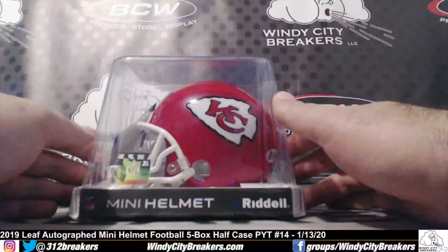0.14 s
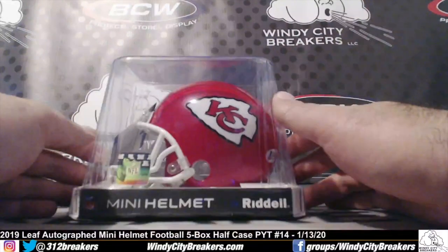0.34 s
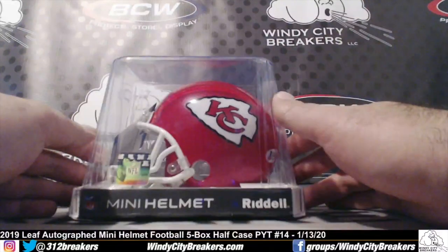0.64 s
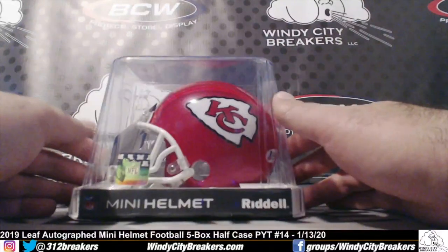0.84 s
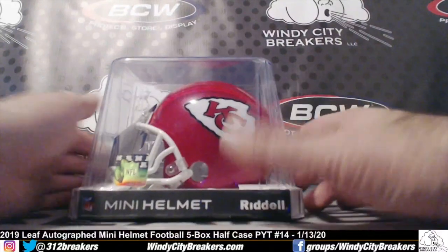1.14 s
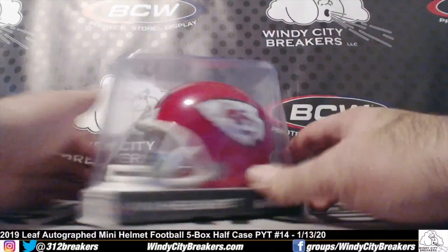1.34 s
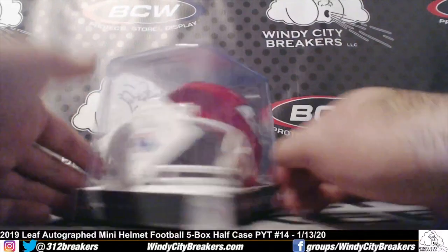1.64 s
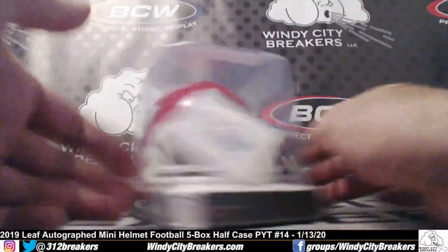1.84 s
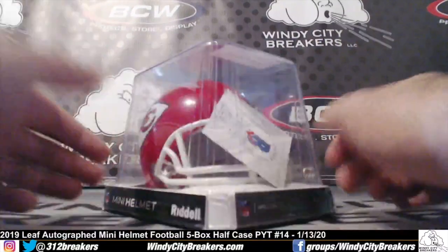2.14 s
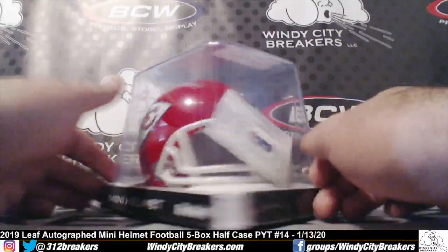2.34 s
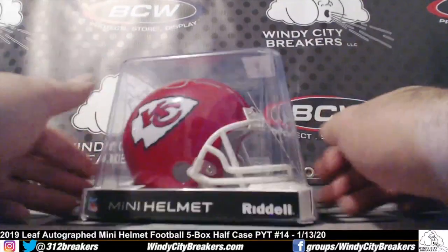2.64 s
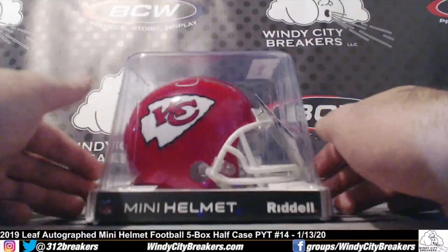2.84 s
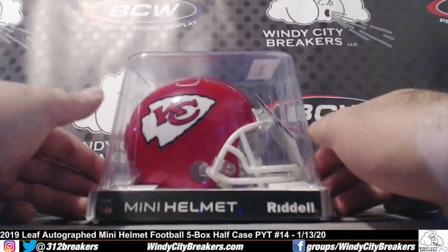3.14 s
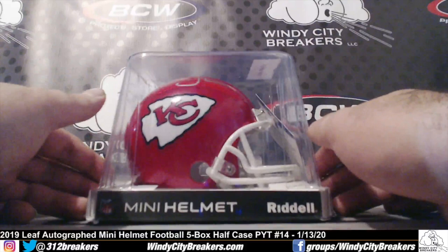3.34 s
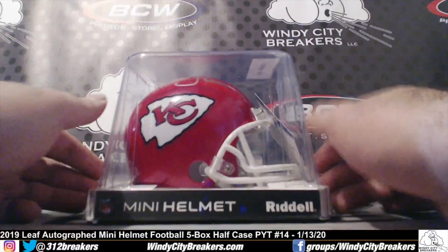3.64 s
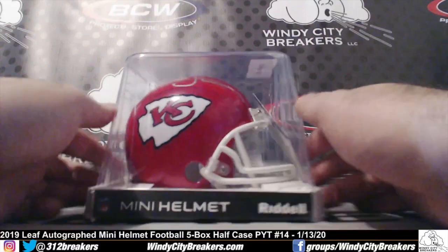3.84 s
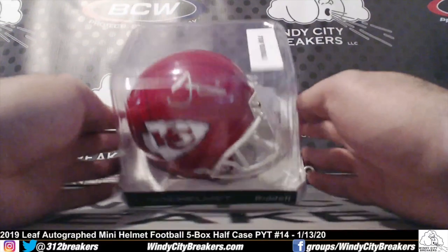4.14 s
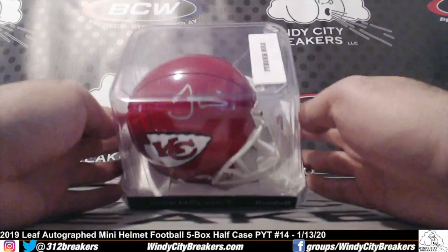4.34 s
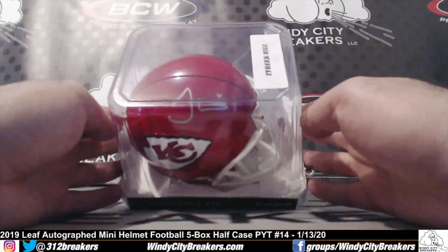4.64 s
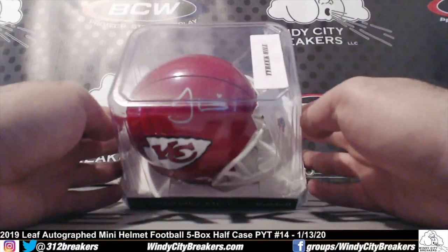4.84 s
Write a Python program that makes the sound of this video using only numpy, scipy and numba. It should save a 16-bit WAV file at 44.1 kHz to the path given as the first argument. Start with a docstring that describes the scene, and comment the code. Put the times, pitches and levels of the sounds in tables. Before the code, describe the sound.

Close plastic handling: short rasping slides, dull bumps and crisp rattling ticks come in bursts, separated by near silence and faint room tone.

```python
"""A small room, a desk microphone close to a table mat; two hands turn a clear plastic display cube.
First room tone, a faint scuff and a soft low hum as pushes reach the table, most likely the stand swaying.
From 0.6 s the base rasps in stick-slip on the mat, the struck cube rings in decaying modes, fingers scuff
its walls and the loose lid ticks in bursts of hard-edged noise; fine skin hiss joins at 1.6 s.
Quick twists and knocks fill 2 to 2.8 s; slides return at 3.4 s, then lid ticks and a last hum thin out."""
import sys
import numpy as np
from scipy import signal
from scipy.fft import rfft, irfft
from scipy.io import wavfile
from numba import njit

SR = 44100
rng = np.random.default_rng(int(sys.argv[2]) if len(sys.argv) > 2 else 0)


def file_out(sig):
    """Save sig as 16-bit WAV at sys.argv[1]."""
    # one column per channel
    cols = np.atleast_2d(sig).T
    # limit, then scale
    lim = np.clip(cols, -1, 1)
    pcm = np.round(lim * 32767).astype(np.int16)
    wavfile.write(sys.argv[1], SR, pcm)


N = 220808
T = np.arange(N) / SR


def undb(db):
    """Decibels to gain."""
    return 10 ** (np.asarray(db) / 20)


def unit(x):
    """Scale to rms 1."""
    return x / np.sqrt(np.mean(x ** 2))


def strike_unit(x):
    """Scale a hit so that its first 10 ms have rms 1."""
    return x / np.sqrt(np.mean(x[:SR // 100] ** 2))


def add(out, s, x, pan_db=0):
    """Mix a sound into both channels at time s; a positive pan leans left."""
    i = int(s * SR)
    x = x[:N - i]
    out[:, i:i + len(x)] += undb([[pan_db / 2], [-pan_db / 2]]) * x


def colour(x, points, peaks=(), size=4096):
    """Causal minimum-phase filter from a (Hz, dB) outline with resonances (Hz, width Hz, dB) on top."""
    hz = np.maximum(np.fft.rfftfreq(size, 1 / SR), 1)
    f, db = np.transpose(points)
    db = np.interp(np.log(hz), np.log(f), db)
    for centre, width, peak_db in peaks:
        db = db + peak_db / (1 + (2 * (hz - centre) / width) ** 2)
    # folding the cepstrum forward in time makes the filter causal
    cepstrum = irfft(np.log(undb(db)))[:size // 2]
    cepstrum[1:] *= 2
    impulse = irfft(np.exp(rfft(cepstrum, size)))
    return signal.fftconvolve(x, impulse)[:len(x)]


@njit
def bandpass(x, hz, share):
    """State-variable band-pass with a moving centre; share = width / centre."""
    y, band, low = np.empty(len(x)), 0., 0.
    for i in range(len(x)):
        g = np.tan(np.pi * hz[i] / SR)
        v = (band + g * (x[i] - low)) / (1 + g * (g + share))
        band, low, y[i] = 2 * v - band, low + 2 * g * v, share * v
    return y


def fade(t, t60):
    """Exponential decay, 60 dB down after t60."""
    return np.exp(-np.log(1000) * t / t60)


def walk(rate):
    """Smooth random wander with a spread near 1, rate turning points per second."""
    knots = rng.standard_normal(N // 100)
    return np.interp(T * rate, np.arange(len(knots)), knots)


def slips(n, rate, spread_db):
    """Tiny stick-slip releases of uneven size, rate per second."""
    released = rng.random(n) < rate / SR
    return released * rng.standard_normal(n) * undb(spread_db * rng.exponential(size=n))


# spectrum of the empty room at the microphone: (f/Hz, relative level/dB)
ROOM_SPECTRUM = [(30, -36), (140, -2.5), (290, -12), (850, -20.5), (1350, -29.5), (2090, -29.5),
                 (3200, -34.5), (4300, -28.5), (6300, -37.5), (8150, -51)]
ROOM_TONE_DB = -70.5  # middle rms level before the wander and the microphone


def room_tone(side_db=-8, wander_db=2.0):
    """Quiet, slightly uneven rumble and hiss of the room."""
    mid, side = (unit(colour(rng.standard_normal(N), ROOM_SPECTRUM)) for _ in range(2))
    stereo = mid + undb(side_db) * side * np.array([[1], [-1]])
    return stereo * undb(ROOM_TONE_DB + wander_db * walk(35))


def room(x, wet_db=-24, t60=0.11, side_db=2):
    """Short, soft reflections from the desk and the walls: decaying noise tails, one mid and one side."""
    t = T[:SR // 2]
    envelope = fade(t, t60) * np.minimum(t / 0.0047, 1)
    tails = [colour(rng.standard_normal(len(t)) * envelope, [(1500, -5.5), (7000, -4.5)]) for _ in range(2)]
    mid, side = (signal.fftconvolve(x.mean(axis=0), h / np.sqrt(np.sum(h ** 2)))[:N] for h in tails)
    return x + undb(wet_db) * (mid + undb(side_db) * side * np.array([[1], [-1]]))


# swells of the low hum: (t/s, length/s, relative level/dB)
HUM_SWELLS = [(0.414, 0.1, -50.5), (0.534, 0.096, -43.5), (0.972, 0.037, -41.5), (1.15, 0.07, -45),
              (1.565, 0.07, -41), (1.939, 0.2, -45.5), (2.09, 0.12, -48), (2.283, 0.081, -43.5),
              (2.498, 0.1, -41), (2.911, 0.075, -45.5), (4.506, 0.13, -46)]


def sways(gain_db=0, hz=138, glide=1.0, lowest_at=0.49, waver=.03, flutter_db=3, pan_db=14):
    """A low tone swells and dies, gliding down as weight comes on and up as it leaves; stronger on the left."""
    out = np.zeros((2, N))
    for s, length, db in HUM_SWELLS:
        n = int(length * SR)
        progress = np.linspace(0, 1, n)
        pitch = hz * (1 + glide * (progress - lowest_at) ** 2 + waver * walk(52)[:n])
        swell = np.sin(np.pi * progress) * undb(flutter_db * walk(36)[:n])
        tone = np.sin(2 * np.pi * np.cumsum(pitch) / SR) * swell
        # the divisor keeps the mean gain of the two channels independent of the pan
        add(out, s, 2 * undb(db + gain_db) * tone / np.cosh(np.log(undb(pan_db / 2))), pan_db)
    return out


# spectrum of skin on the smooth wall: (f/Hz, relative level/dB)
SKIN_HISS = [(1760, -65), (3000, -16), (3760, -12.5), (6530, 1), (7310, -8), (8150, -22.5)]
# strokes of skin gliding over the smooth wall: (t/s, length/s, relative level/dB)
SKIN_GLIDES = [(1.606, 0.18, -56), (2.211, 0.15, -56), (2.512, 0.16, -63)]


def glides(gain_db=3, judder_db=-7.0):
    """A light, fast touch only stirs the treble; it swells and fades with the stroke."""
    out = np.zeros((2, N))
    for s, length, db in SKIN_GLIDES:
        n = int(length * SR)
        hiss = unit(colour(slips(SR // 4, 10000, 0.86), SKIN_HISS))[:n]
        hiss = hiss * undb(judder_db * walk(57)[:n])
        stroke = np.sin(np.linspace(0, np.pi, n))
        add(out, s, undb(db + gain_db) * hiss * stroke)
    return out


# resonances of the cube and its base: (f/Hz, relative level/dB, t60/s); scuffs use f and level, knocks all
CUBE_MODES = [(246, -8, 0.012), (286.3, 4, 0.04), (351.5, -4, 0.14), (492, -7.5, 0.071), (560, 0, 0.049),
              (649.4, 0.5, 0.071), (808, -4.5, 0.027), (1082, -2.5, 0.031), (1360, -1, 0.016),
              (1900, 2.5, 0.023)]
# scuffs of skin and base: (t/s, length/s, relative level/dB, middle pitch f/Hz, what the contact does)
CONTACT_SCUFFS = [(0.371, 0.043, -56, 234, "settle"), (0.739, 0.077, -37, 467, "press"),
                  (0.956, 0.085, -41, 407, "press"), (1.088, 0.13, -36, 493, "lift"),
                  (1.209, 0.04, -38.5, 284, "drag"), (1.323, 0.03, -46, 950, "settle"),
                  (1.428, 0.047, -38, 704, "press"), (1.539, 0.081, -33.5, 345, "lift"),
                  (1.622, 0.073, -37, 884, "drag"), (1.751, 0.025, -59, 840, "drag"),
                  (1.774, 0.061, -44.5, 148, "settle"), (2.105, 0.13, -41.5, 666, "drag"),
                  (2.283, 0.05, -46, 537, "press"), (2.453, 0.038, -59, 400, "drag"),
                  (2.525, 0.014, -43, 1740, "press"), (2.556, 0.095, -43, 390, "drag"),
                  (2.781, 0.036, -36.5, 893, "press"), (2.8, 0.047, -39.5, 536, "lift"),
                  (2.847, 0.044, -51, 690, "drag"), (3.425, 0.12, -45, 321, "settle"),
                  (3.578, 0.027, -37, 148, "settle"), (3.609, 0.069, -40, 390, "press"),
                  (3.725, 0.03, -40, 680, "press"), (3.825, 0.07, -45.5, 150, "settle"),
                  (3.849, 0.091, -49.5, 656, "settle"), (3.996, 0.048, -46.5, 170, "settle"),
                  (4.346, 0.063, -60.5, 500, "press")]
# a scuff holding a steady pitch is a drag, under either label
CONTACT_SCUFFS = [(*row, "drag" if contact == "settle" else contact) for *row, contact in CONTACT_SCUFFS]
# how far the pitch moves during a scuff, contact -> octaves: a press sinks, a lift climbs, a drag stays
SCUFF_PITCH_OCTAVES = {"press": -1.9, "settle": 0.019, "drag": 0, "lift": 0.86}
SCUFF_WIDTH = .45  # width of the resonance as a share of its pitch


def scuffs(gain_db=0, judder_db=1.5, rise_s=0.0037, fall_db=15, body_db=8, rumble_db=-19, rumble_hz=95,
           pan_db=1.5):
    """Skin and base judder in short runs; pitch sinks as contact spreads, climbs as it lifts, holds in a drag."""
    out, t = np.zeros((2, N)), T[:SR // 4]
    body = [(hz, hz / 9, body_db + db) for hz, db, _ in CUBE_MODES if hz < 1500]
    outline = [(60, 3.0), (190, 7.0), (260, -5.0), (1800, -11.5), (5000, -21.5)]
    rumble_outline = [(rumble_hz / 2, -14), (rumble_hz, 0), (600, -35), (3000, -70)]
    for s, length, db, middle_hz, contact in CONTACT_SCUFFS:
        progress = t / length
        hz = middle_hz * 2 ** (SCUFF_PITCH_OCTAVES[contact] * (np.minimum(progress, 1) - .5))
        run = colour(slips(len(t), 2700, 0.86), outline, body)
        run = bandpass(run, hz, SCUFF_WIDTH) * undb(judder_db * walk(170)[:len(t)])
        run *= np.minimum(t / rise_s, 1) * undb(-fall_db * progress ** 2)
        run /= np.sqrt(np.sum(run ** 2) / (length * SR / 2))
        # the table rumbles late, once the weight bears on it
        rumble = unit(colour(rng.standard_normal(len(t)), rumble_outline))
        rumble *= np.exp(-((progress - .7) / 0.56) ** 2)
        add(out, s, undb(db + gain_db) * (run + undb(rumble_db) * rumble), pan_db)
    return out


# thin wall resonances, for ticks and slides alike: (f/Hz, width/Hz, peak level/dB)
WALL_MODES = [(693.7, 160, 4), (1217, 350, 3.5), (2130, 130, 4), (3750, 130, 3), (5200, 1200, 3.25)]
# spectrum of the hard plastic lid: (f/Hz, relative level/dB)
LID_SPECTRUM = [(240, -56), (400, -27.5), (1500, -4.5), (2720, -4), (3010, 2), (4020, -1), (4390, 1.5),
                (4860, 1), (7280, -14), (8150, -34.5)]
# the lid ticking in its seat: (t/s, relative level/dB)
LID_TICKS = [(0.684, -46), (1.0664, -33.5), (1.439, -21.5), (1.5151, -20), (1.528, -17.5), (1.554, -29),
             (1.572, -22), (1.579, -27), (1.586, -29.5), (1.598, -33.5), (2.122, -44), (2.1403, -33),
             (3.423, -43.5), (3.7165, -30), (3.729, -26), (3.8, -37.5), (3.853, -33.5), (3.897, -34.5),
             (4.106, -39), (4.184, -27), (4.198, -38), (4.296, -32.5), (4.340, -33.5), (4.442, -36.5),
             (4.8691, -35.5)]
SNAP_T60, LID_T60, HOLLOW_T60 = .011, .07, .13  # s


def clicks(gain_db=-13, ring_db=-6, spike=4, pan_db=-2, hollow_hz=1500, hollow_db=-13):
    """A sharp snap of hard plastic, a short, duller lid ring, and a hollow box note that outlasts both."""
    out, t = np.zeros((2, N)), T[:SR // 6]
    for s, db in LID_TICKS:
        snap, ring, hollow = rng.standard_normal((3, len(t)))
        snap[0] = spike
        snap = colour(snap * fade(t, SNAP_T60), LID_SPECTRUM, WALL_MODES)
        ring = colour(ring * fade(t, LID_T60), LID_SPECTRUM, WALL_MODES)
        ring = colour(ring, [(1400, 10.0), (3200, -0.5)])
        for _ in range(2):
            hollow = bandpass(hollow, np.full(len(t), float(hollow_hz)), 0.13)
        hollow = undb(hollow_db) * unit(hollow) * fade(t, HOLLOW_T60)
        tick = strike_unit(snap) + undb(ring_db) * strike_unit(ring) + hollow
        add(out, s, undb(db + gain_db) * tick, pan_db)
    return out


BOUNCE_SCATTER = .25  # share of the rebound delay


def with_bounce(events, delay_s, drop_db):
    """Follow every hit with a weaker second one, a little sooner or later each time."""
    delays = delay_s * (1 + BOUNCE_SCATTER * rng.uniform(-1.1, 1, len(events)))
    hits = []
    for (s, db, *rest), lag in zip(events, delays):
        hits += [(s, db, *rest), (s + lag, db + drop_db, *rest)]
    return hits


# the cube knocking on table and fingers:
# (t/s, relative level/dB, strongest pitch f/Hz, bare or cushioned contact)
CUBE_KNOCKS = [(.627, -50, 656, "bare"), (.682, -38.5, 1530, "bare"), (.722, -31, 560, "cushioned"),
               (.738, -24, 595, "cushioned"), (.752, -32.5, 436, "cushioned"),
               (.777, -26, 325, "cushioned"), (.963, -25.5, 323, "cushioned"), (1.066, -19, 362, "bare"),
               (1.070, -25, 1280, "bare"), (1.080, -21, 366, "bare"), (1.090, -26.5, 1050, "bare"),
               (1.127, -31.5, 1260, "bare"), (1.5153, -12.5, 322, "bare"), (1.522, -11, 261, "cushioned"),
               (1.526, -10.5, 556, "bare"), (2.0495, -26, 666, "cushioned"),
               (2.0744, -16, 477, "cushioned"), (2.0752, -33.5, 2470, "bare"), (2.090, -20, 392, "bare"),
               (2.1398, -25, 790, "bare"), (2.153, -30.5, 269, "cushioned"), (2.277, -29, 615, "cushioned"),
               (2.3195, -21, 687, "bare"), (2.536, -19, 717, "bare"), (2.547, -20, 366, "cushioned"),
               (2.563, -22.5, 250, "cushioned"), (2.768, -41, 1600, "bare"),
               (2.796, -21.5, 356, "cushioned"), (3.602, -31, 560, "cushioned"),
               (3.613, -18.5, 515, "cushioned"), (3.934, -30.5, 1144, "bare"), (4.1067, -28, 900, "bare")]
# a finger or the mat under the blow swallows its treble: (f/Hz, relative level/dB)
CUSHION_LOSS = [(1400, 0), (3000, -20)]
REBOUND_S, REBOUND_DB = 0.011, -13  # the cube rocks and lands once more after every blow
CRACK_T60 = .03  # s
PANEL_SINK_OCTAVES = .45  # the struck panel's note sinks as the contact settles


def knocks(gain_db=-8, detune=0.035, damping=1.0, slope_db=6, crack_db=-8, crack_tilt_db=5, panel_db=-2,
           panel_cycles=19):
    """A blow rings body and panel; harder contact favours high modes and cracks more, cushioned is dull."""
    out, t = np.zeros((2, N)), T[:SR // 4]
    hz, mode_db, t60 = np.transpose(CUBE_MODES)
    for s, db, centre_hz, contact in with_bounce(CUBE_KNOCKS, REBOUND_S, REBOUND_DB):
        # modes far from the strongest pitch are weaker
        octaves = np.log2(hz / centre_hz)
        weight = undb(mode_db - slope_db * octaves ** 2 / np.hypot(1, octaves))
        gripped_hz = hz * (1 + detune * rng.standard_normal(len(hz)))  # the grip shifts the modes
        sign = rng.choice([-1, 1], len(hz))
        modes = np.cos(2 * np.pi * gripped_hz[:, None] * t) * fade(t, damping * t60[:, None])
        ring = (weight * sign) @ modes
        dying = fade(t, panel_cycles / centre_hz)
        panel_hz = centre_hz * 2 ** (PANEL_SINK_OCTAVES * (dying - .5))
        panel = np.sin(2 * np.pi * np.cumsum(panel_hz) / SR) * dying
        ring = strike_unit(ring) + undb(panel_db) * strike_unit(panel)
        ring = ring * np.minimum(t / 0.00027, 1)
        reach = [(centre_hz / 10, -30), (centre_hz, 0), (3 * centre_hz, -5), (20 * centre_hz, -48)]
        crack = colour(rng.standard_normal(len(t)) * fade(t, CRACK_T60), reach)
        crack = strike_unit(crack) * undb(crack_db + crack_tilt_db * np.log2(centre_hz / 600))
        blow = strike_unit(ring) + crack
        if contact == "cushioned":
            blow = colour(blow, CUSHION_LOSS)
        add(out, s, undb(db + gain_db) * strike_unit(blow))
    return out


# pushes of the base along the mat, the two faintest being fingers creeping on the walls:
# (t/s, length/s, relative level/dB)
BASE_SLIDES = [(0.674, 0.43, -45.5), (1.057, 0.24, -44), (1.248, 0.14, -47.5), (1.299, 0.35, -49),
               (1.593, 0.19, -61.5), (1.598, 1.3, -72.5), (3.404, 0.48, -49), (3.618, .45, -48.5),
               (3.928, 0.54, -76.5)]
# quick twists of the base as the hands shift their grip: (peak t/s, relative level/dB)
BASE_TWISTS = [(2.135, -50.5), (2.278, -48.5), (2.319, -48), (2.542, -42.5), (2.796, -47), (3.621, -40.5)]
TWIST_RISE_DB_PER_S, TWIST_FALL_DB_PER_S = 704.5, 613


def push_strength():
    """Strength of the rubbing: pushes swell and ease off into one another, twists peak and die at once."""
    power = np.zeros(N)
    for s, length, db in BASE_SLIDES:
        power += (undb(db) * np.sin(np.pi * np.clip((T - s) / length, 0, 1))) ** 2
    for s, db in BASE_TWISTS:
        drop_db = np.maximum(TWIST_RISE_DB_PER_S * (s - T), TWIST_FALL_DB_PER_S * (T - s))
        power += undb(db - drop_db) ** 2
    return np.sqrt(power)


# spectrum of the base rasping on the mat: (f/Hz, relative level/dB)
BASE_RASP = [(150, -29), (250, -7), (410, -22), (654, -5.5), (880, -3), (1140, -8.5), (2100, -3),
             (3930, -6.5), (5190, -5), (6940, -12.5), (8150, -32.5)]


def sliding(rasp_db=3, judder_db=1.9, wall_hz=1400, shift=0.51, wall_db=-5, side_db=-11, echo_s=.0007,
            echo_drift=0.5, echo_db=-10):
    """Dense slips on the mat ring the walls; one resonance and the reflection off the hand move with the grip."""
    mid, side = (unit(colour(slips(N, 14000, 0.26), BASE_RASP, WALL_MODES)) for _ in range(2))
    hz = np.clip(wall_hz * 2 ** (shift * walk(14)), 300, 6000)
    mid = mid + undb(wall_db) * bandpass(mid, hz, 0.32)
    delay = echo_s * 2 ** (echo_drift * walk(16))
    mid = mid + undb(echo_db) * np.interp(T - delay, T, mid)
    side = undb(side_db) * bandpass(side, hz, 0.75)
    stereo = mid + side * np.array([[1], [-1]])
    return stereo * push_strength() * undb(rasp_db + judder_db * walk(70))


def scene():
    """The handled cube in its room, over the low hum and the room tone."""
    cube = sliding() + glides() + knocks() + clicks() + scuffs()
    return room(cube) + sways() + room_tone()


def record(dry):
    """The microphone thins the bass below 60 Hz and cuts steeply above its narrow band, at 8200 Hz."""
    dry = signal.sosfilt(signal.butter(4, 60, "high", fs=SR, output="sos"), dry)
    return signal.sosfilt(signal.ellip(8, .2, 60, 8200, fs=SR, output="sos"), dry)


dry = scene()
out = record(dry)
file_out(out)
```